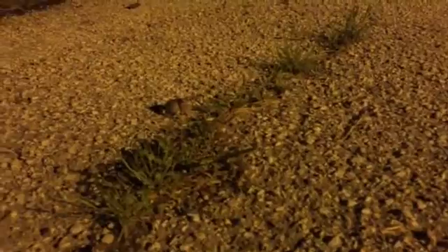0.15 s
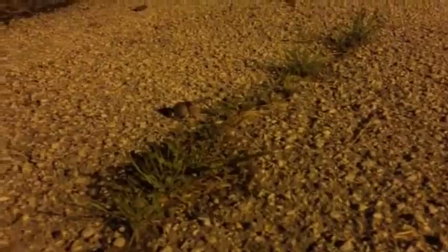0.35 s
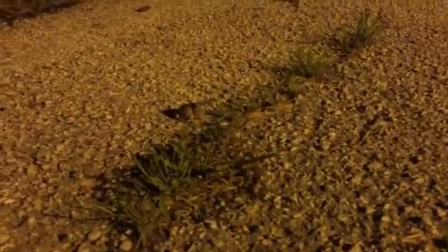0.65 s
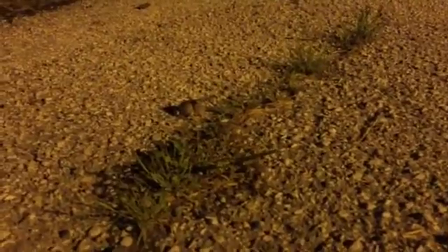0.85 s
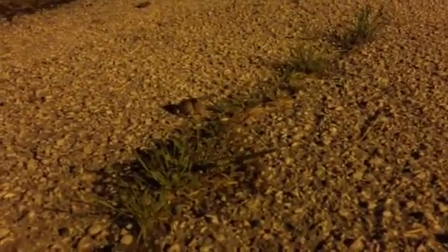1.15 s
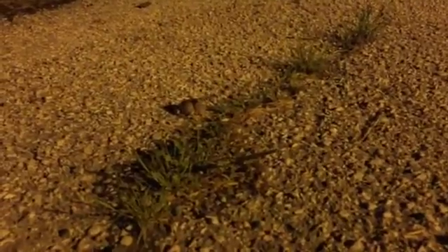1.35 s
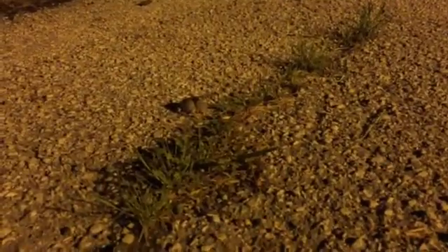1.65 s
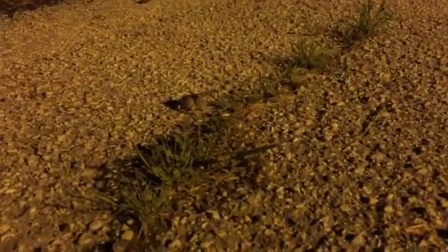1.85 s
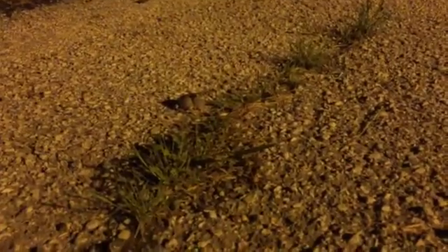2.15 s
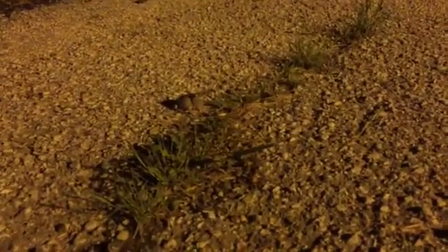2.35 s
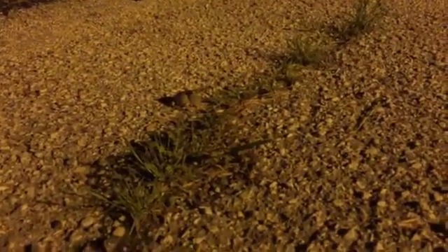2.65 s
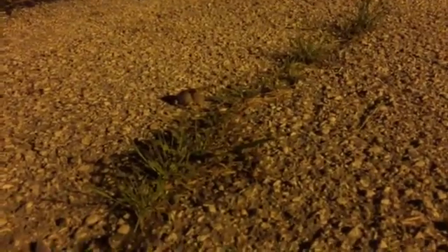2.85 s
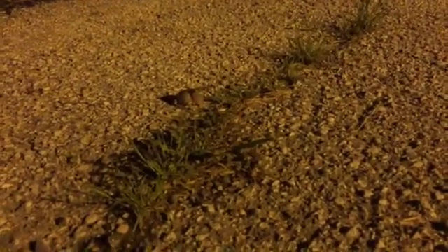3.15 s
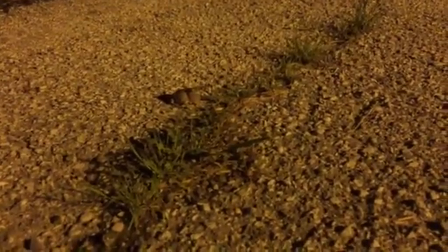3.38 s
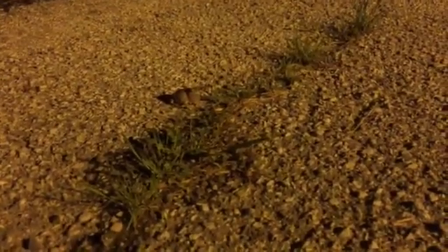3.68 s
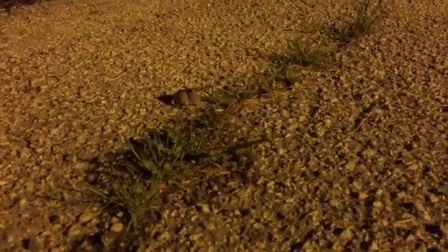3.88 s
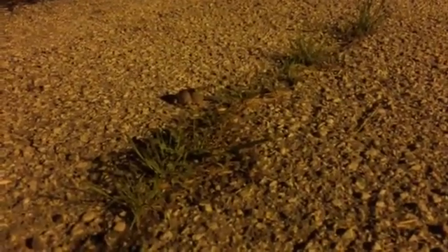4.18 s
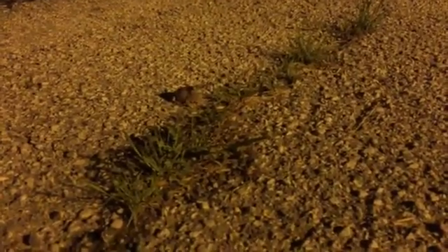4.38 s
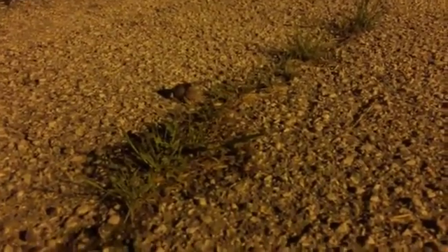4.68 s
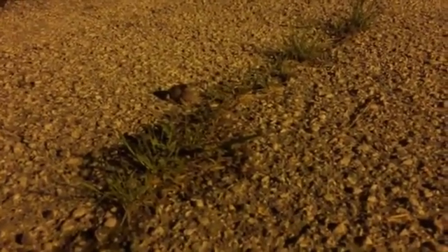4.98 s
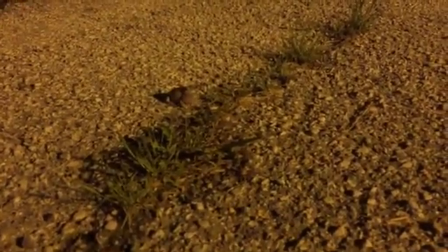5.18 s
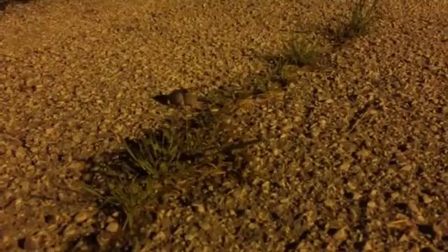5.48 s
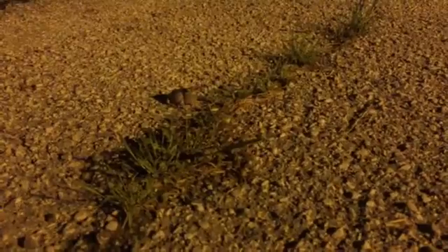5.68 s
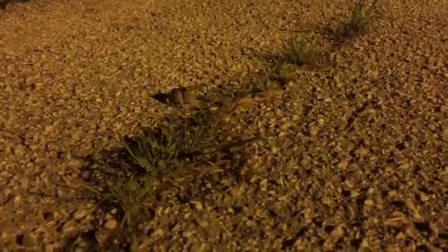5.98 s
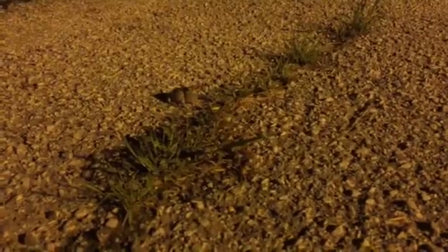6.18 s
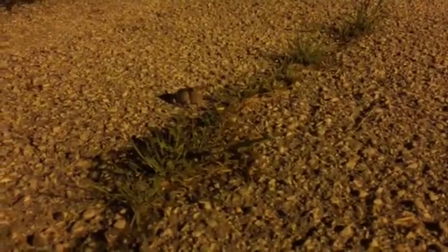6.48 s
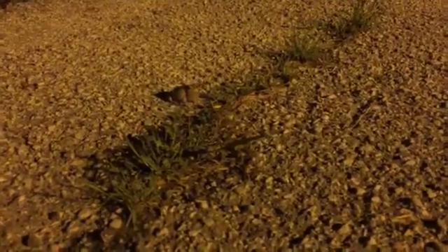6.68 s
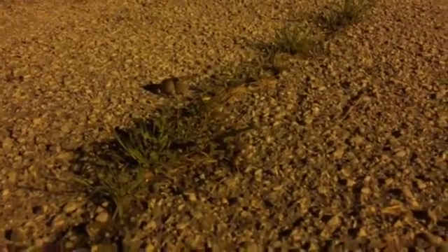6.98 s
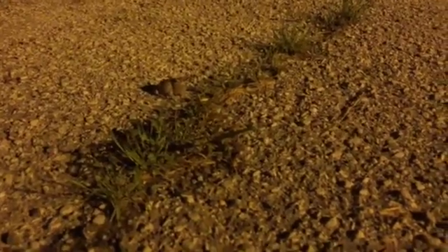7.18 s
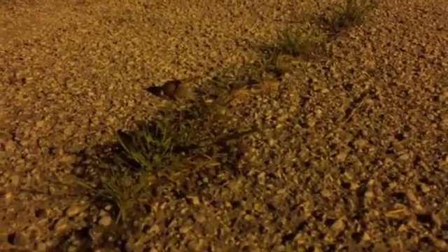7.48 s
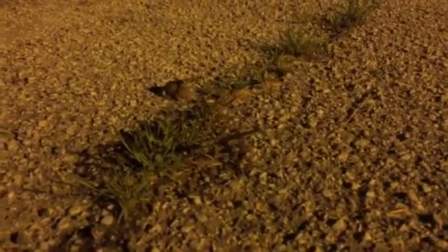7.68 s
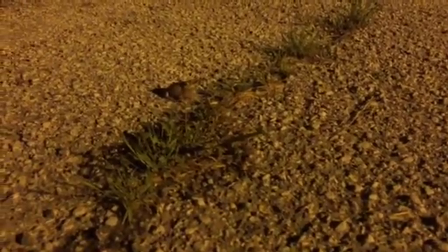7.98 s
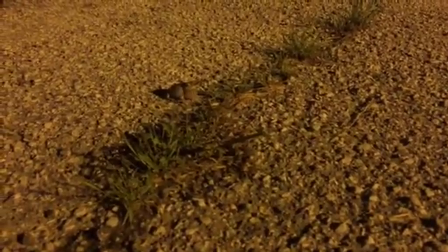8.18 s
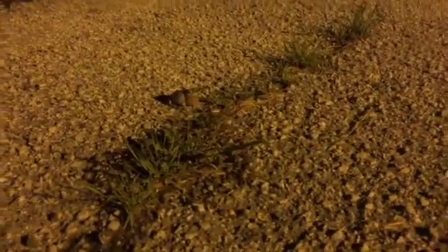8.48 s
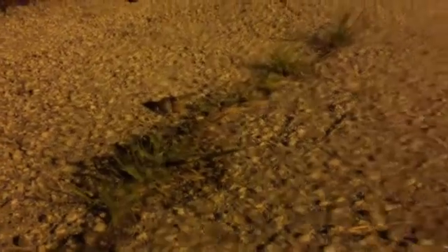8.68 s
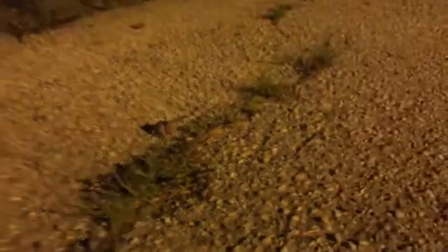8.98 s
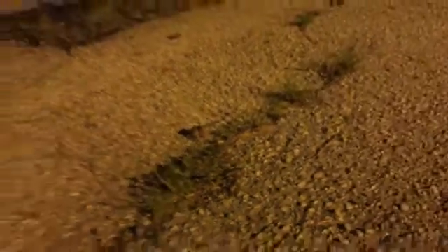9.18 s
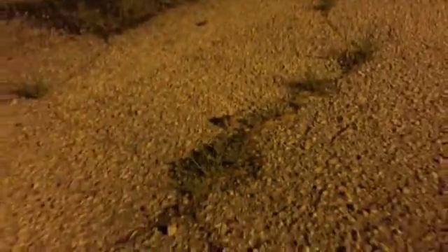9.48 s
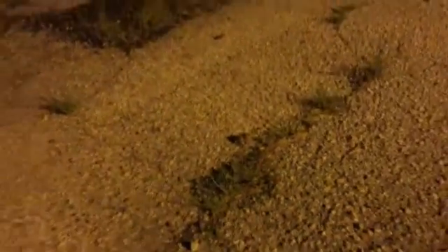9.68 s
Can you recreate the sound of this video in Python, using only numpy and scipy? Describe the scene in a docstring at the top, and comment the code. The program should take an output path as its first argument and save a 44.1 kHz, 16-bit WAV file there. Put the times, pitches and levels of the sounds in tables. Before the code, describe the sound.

Toads and small frogs call far off at night over a steady low hum, while one very near toad rattles loudly twice.

```python
"""A toad on a gravel road at night gives two loud rattling calls, each a train of short rising pulses:
air squeezed past its vocal cords rings in its swelling vocal sac. Behind it are more toads of its kind,
a faster trill, small peeping frogs, one insect chirp, faint rustles, a brief low tone, night air and the
drone of distant machinery. The close calls overload the microphone, and its gain control ducks the
background, which then swells back."""
import sys
import numpy as np
from scipy import signal
from scipy.fft import rfft, irfft, next_fast_len
from scipy.io import wavfile
from scipy.ndimage import uniform_filter1d, minimum_filter1d

SR = 44100
rng = np.random.default_rng(int(sys.argv[2]) if len(sys.argv) > 2 else 0)


def materialize(psi):
    """Save the field psi as 16-bit PCM at rate SR to the path in sys.argv[1].

    A 1-D psi becomes a single channel; in a 2-D psi each row is a channel.
    """
    bounded = np.clip(np.atleast_2d(psi).T, -1, 1)
    quanta = np.round(bounded * 32767).astype(np.int16)
    wavfile.write(sys.argv[1], SR, quanta)


N = 433944
TIME = np.arange(N) / SR


def from_db(db):
    """Decibels to gain."""
    return 10 ** (np.asarray(db) / 20)


def rms_one(x):
    """Scale to an rms of 1."""
    return x / np.sqrt(np.mean(x ** 2) + 1e-20)


def phase_of(hz):
    """Running phase of a moving pitch."""
    return 2 * np.pi * np.cumsum(hz) / SR


def envelope(start_s, end_s, attack_s, release_s):
    """Rise from the start, hold, and die away after the end."""
    rise = 1 - np.exp(-np.maximum(TIME - start_s, 0) / attack_s)
    return rise * np.exp(-np.maximum(TIME - end_s, 0) / release_s)


def shaped_noise(gain_at):
    """Noise of rms 1 whose spectrum is a function of frequency."""
    size = next_fast_len(N)
    hz = np.maximum(np.fft.rfftfreq(size, 1 / SR), 1)
    return rms_one(irfft(rfft(rng.standard_normal(size)) * gain_at(hz), size)[:N])


def coloured(spectrum):
    """Noise through an EQ curve of (Hz, dB) points."""
    points_hz, db = np.transpose(spectrum)
    return shaped_noise(lambda hz: from_db(np.interp(np.log(hz), np.log(points_hz), db)))


def narrow(centre_hz, width_hz):
    """Noise around one frequency."""
    return shaped_noise(lambda hz: 1 / (1 + ((hz - centre_hz) / width_hz) ** 2))


def drift(speed_hz):
    """A random modulator, moving mostly below this speed."""
    return narrow(0, speed_hz)


def scatter(x, t60):
    """Many small reflections off gravel and plants, dying away."""
    t = np.arange(int(t60 * SR)) / SR
    echoes = rng.standard_normal(len(t)) * from_db(-60 * t / t60) * (1 - np.exp(-t / 0.0027))
    return signal.fftconvolve(x, echoes / np.linalg.norm(echoes))[:N]


def add(out, sound, s):
    """Mix a sound in from time s."""
    start = int(round(s * SR))
    low, high = max(start, 0), min(start + len(sound), N)
    if high > low:
        out[low:high] += sound[low - start:high - start]


# EQ of the night's noise bed. Each row: frequency in Hz, relative level in dB.
AIR_EQ = [(25, -28), (45, -11), (65, 1), (115, -1.5), (170, -2.5), (270, -4.5), (390, -5), (480, -11.5),
          (800, -12), (1600, -20), (2800, -27.5), (4400, -40.5), (5700, -43), (9000, -50), (15000, -58)]


def night_air(level_db=-42):
    """Night air and far traffic make a steady, dark bed."""
    return from_db(level_db) * coloured(AIR_EQ)


# The machinery's upper tones. Each row: pitch in Hz, width of its waver in Hz, level in dB.
DRONE_TONES = [(151.5, 4.9, -50.5), (234, 3.9, -47.5), (295, 10.17, -52.5), (343.2, 3.63, -47.5),
               (357.7, 5, -64.5), (379, 4.11, -50.5), (415.3, 4, -56.5), (537, 5, -63.5), (677, 5, -62)]


def machinery(motor_hz=76.5, second_motor_hz=99.6):
    """The hum of two distant motors grows slowly fainter, under higher tones that waver on their way."""
    def tone(hz, width_hz, waver_db):
        phase = phase_of(hz + width_hz * drift(10.65) / 2)
        return rms_one(np.sin(phase) * from_db(waver_db * drift(9.2)))
    motor_db = -40.5 - 2 * np.maximum(TIME - 5.36, 0)
    surge_db = 9 * np.exp(-((TIME - 0.65) / 0.38) ** 2 / 2)
    second_db = -46 - 2 * TIME + surge_db
    hums = from_db(motor_db) * tone(motor_hz, 1.8, waver_db=0.6)
    hums += from_db(second_db) * tone(second_motor_hz, 2.86, waver_db=0.6)
    return hums + sum(from_db(db) * tone(hz, width, waver_db=0.5) for hz, width, db in DRONE_TONES)


def low_tone(start_s=5.96, end_s=6.22, level_db=-36.5, pitch_hz=182.2, sag_hz_per_s=74):
    """A soft, nearly pure far tone sinks and fades."""
    hz = pitch_hz - sag_hz_per_s * np.clip(TIME - start_s, 0, .5) + 3.97 * drift(10)
    level = from_db(level_db - 0.5 * drift(29)) * envelope(start_s, end_s, 0.013, 0.18)
    return np.sqrt(2) * level * np.sin(phase_of(hz))


def insect(start_s=6.07, end_s=6.27, level_db=-78, pitch_hz=8950):
    """One faint, thin insect chirp."""
    return from_db(level_db) * envelope(start_s, end_s, .02, .03) * narrow(pitch_hz, 200)


# Rustles and a tick. Each row: peak time in seconds, level in dB, half-width in seconds, centre in Hz.
RUSTLES = [(3.4, -63, 0.02, 7360), (3.478, -68, .008, 6500), (8.692, -50, 0.001, 9500),
           (9.75, -72.5, 0.19, 7500)]


def grit():
    """Faint bursts of high noise, as of small stones and dry grass."""
    return sum(from_db(db) * np.exp(-((TIME - s) / width_s) ** 2 / 2) * narrow(hz, 3000)
               for s, db, width_s, hz in RUSTLES)


# Fader ride of the small frogs. Each row: time in seconds, level in dB.
FROG_FADER = [(0, -59), (1.2, -59.5), (1.6, -67), (3.9, -63.5), (6.5, -60), (9.25, -58), (9.84, -52.5)]


def small_frogs(pips_per_s=6.5, half_width_s=.0025, sweep=0.085, spread=0.045, wet_db=1.5):
    """Six small far frogs repeat short, rising pips, each at its own uneven pace."""
    level_db = np.interp(TIME, *np.transpose(FROG_FADER))
    # the harder they call, the higher, up to a limit
    pitch_hz = np.minimum(3470 + 12 * (level_db - level_db.mean()), 3519)
    out = np.zeros(N)
    for place in np.linspace(-1, 1, 6):
        rate = pips_per_s * (1 + .15 * place)
        beats = np.cumsum(rate * (1 + .3 * drift(3.5))) / SR + rng.random()
        within = (beats % 1 - .5) / rate / half_width_s
        hz = pitch_hz * (1 + spread * place + sweep * np.tanh(within / 2) + 0.033 * drift(200))
        uneven = from_db(2.5 * np.tanh(drift(5)))
        out += np.exp(-within ** 2 / 2) * uneven * np.sin(phase_of(hz))
    return from_db(level_db) * rms_one(out + from_db(wet_db) * scatter(out, t60=0.22))


def peeper(level_db=-66.5, pitch_hz=3340, peeps_per_s=5.4, half_width_s=0.0078, sweep=.04, wet_db=-4.5):
    """One small frog, a little nearer, keeps up fairly regular rising peeps."""
    beats = np.cumsum(peeps_per_s * (1 + 0.128 * drift(2))) / SR
    within = (beats % 1 - .5) / peeps_per_s / half_width_s
    hz = pitch_hz * (1 + sweep * np.tanh(within / 2) + 0.024 * drift(200))
    peeps = np.exp(-within ** 2 / 2) * np.sin(phase_of(hz))
    return from_db(level_db) * rms_one(peeps + from_db(wet_db) * scatter(peeps, t60=0.16))


def trill(start_s=1.72, end_s=5.8, level_db=-49, pitch_hz=1752, pulses_per_s=53, wet_db=-5.5):
    """A far toad of another kind holds one fast trill, sliding up into its note."""
    hz = pitch_hz - 110 * np.exp(-np.maximum(TIME - start_s, 0) / .12) + 14 * drift(46)
    throb = np.maximum(np.sin(2 * np.pi * pulses_per_s * TIME), 0) ** 0.77
    voice = throb * np.sin(phase_of(hz))
    level = from_db(level_db) * envelope(start_s, end_s, attack_s=0.1, release_s=0.34)
    return level * rms_one(voice + from_db(wet_db) * scatter(voice, t60=0.46))


# A toad pulse's layers: fundamental, octave, buzz. Each row: crest level in dB, growth in dB per second,
# resonance lift in dB, resonance width as a share of the pitch, release start in seconds past the crest.
PULSE_LAYERS = [(-14, 849, 6.5, .15, 0.0058), (0.67, 135, 27, 0.084, 0.0048),
                (8.5, 379.5, 16, 0.047, 0.0079)]


def pulse_shape(t, climb_per_s=10.5, attack_db_per_s=6493, release_db_per_s=3698):
    """Pitch ratio and layer levels at t seconds from the crest, where the pitch meets the resonance."""
    climbing = np.clip(t, -0.01546, 0.007)
    end_flick = 0.019 * np.expm1(climbing / 0.0033)
    ratio = 1 + climb_per_s * climbing + end_flick
    attack_db = attack_db_per_s * np.minimum(t + 0.015, 0)
    levels_db = []
    for crest_db, growth, lift_db, width, release_s in PULSE_LAYERS:
        resonance_db = lift_db * np.expm1(-((ratio - 1) / width) ** 2 / 2)
        release_db = release_db_per_s * np.maximum(t - release_s, 0)
        levels_db.append(crest_db + attack_db + growth * np.minimum(t, 0) + resonance_db - release_db)
    return ratio, levels_db


# Buzz of the vocal cords. Each row: harmonic number, level in dB within the buzz layer.
CORD_HARMONICS = [(3, -43), (4, -44.5), (5, -46.5), (6, -39.5), (7, -60), (8, -52), (9, -55), (10, -65),
                  (11, -65), (12, -60.5), (13, -59.5)]


def toad_pulse(pitch_hz, fullness, jitter):
    """One squeeze of air sweeps the octave up through the sac's resonance. Gives sound and airflow."""
    t = (np.arange(len(jitter)) - len(jitter) / 2) / SR
    # a slack sac gives shorter, rougher pulses with more fundamental
    slack = 1 - np.clip(fullness, 0, 1)
    ratio, (low_db, octave_db, buzz_db) = pulse_shape(t / (1 - 0.2 * slack))
    low, octave = from_db(low_db + 14 * slack ** 1.33), from_db(octave_db)
    # while the sac is half full the pitch climbs from further below
    half_full = 2 * np.sqrt(slack * (1 - slack))
    ratio = ratio ** (1 + 0.447 * half_full * (t < 0))
    # the cords flutter irregularly until they lock on
    flutter = jitter * (0.019 + .2 * slack + 0.09 * np.clip(-t / .015, 0, 1) ** 2)
    phase = phase_of(pitch_hz * ratio * (1 + 0.16 * flutter))
    harmonics = sum(from_db(db) * np.sin(number * phase) for number, db in CORD_HARMONICS)
    buzz = from_db(buzz_db + 0.5 * slack) * harmonics
    ring = octave * (np.sin(2 * phase) + from_db(-29.5) * np.cos(3 * phase))
    # a puff of air slips through before the cords catch
    puff = from_db(10.5) * half_full * np.exp(-((t + 0.0098) / 0.0024) ** 2 / 2)
    fade = signal.windows.tukey(len(t), .2)
    sound = (low * np.sin(phase) + ring + buzz) * (1 + flutter)
    airflow = np.sqrt(low * octave) + puff
    return sound * fade, airflow * fade


def far_toad(triggers, pitch_hz, dull_hz=2860):
    """A toad pulse on every trigger, dulled by distance."""
    pulse, _ = toad_pulse(pitch_hz, fullness=0.632, jitter=np.zeros(SR // 20))
    call = signal.fftconvolve(triggers, pulse, "same")
    return signal.sosfilt(signal.butter(4, dull_hz, fs=SR, output="sos"), call)


# Fader ride of the far chorus. Each row: time in seconds, level in dB.
CHORUS_FADER = [(0, -41), (1.2, -42.5), (2.4, -42.5), (3.2, -42), (3.9, -44.5), (6.5, -40), (7.3, -45),
                (8.6, -40.5), (9.25, -45.5), (9.84, -37.5)]


def chorus(pitch_hz=1164, spread=0.0606, pulses_per_s=23.8, waver_db=1.8, wet_db=4.5):
    """Four far toads rattle over each other, blurred by distance into an even din."""
    out = np.zeros(N)
    for place in np.linspace(-1, 1, 4):
        rate = pulses_per_s * rng.uniform(.94, 1.06) * (1 + .05 * drift(15))
        beats = np.cumsum(rate) / SR + rng.random()
        triggers = np.diff(np.floor(beats), prepend=0) * from_db(waver_db * drift(0.66))
        out += far_toad(triggers, pitch_hz * (1 + spread * place))
    out += from_db(wet_db) * scatter(out, t60=0.82)
    running_rms = np.sqrt(uniform_filter1d(out ** 2, SR // 2) + 1e-12)
    return from_db(np.interp(TIME, *np.transpose(CHORUS_FADER))) * out / running_rms


# Mid-distance calls. Each row: start and end in seconds, level in dB, pitch in Hz, pulses per second.
NEIGHBOUR_CALLS = [(-.1, 0.357, -45.5, 1082, 24), (0.605, 1.326, -43, 1117, 22.7),
                   (1.75, 2.319, -46, 1177, 17.4), (2.564, 3.102, -47, 1178, 29),
                   (2.894, 3.496, -40.5, 1117, 23.6), (3.999, 4.498, -38.5, 1116, 21.8),
                   (5.75, 6.298, -61, 1127, 42), (6.446, 6.997, -46, 1138, 30.5),
                   (6.883, 7.403, -41, 1141, 21), (8.34, 9.132, -43.5, 1121, 19.8),
                   (9.31, 9.899, -41.5, 1157, 27.5), (9.537, 9.9, -61, 1095, 31)]


def neighbours(swell_s=0.06, uneven_db=.8, jitter_s=0.000998, wet_db=-5):
    """Toads some way off give the near toad's call: it swells, rattles and stops short."""
    out = np.zeros(N)
    for start, end, db, pitch_hz, rate in NEIGHBOUR_CALLS:
        triggers = np.zeros(N)
        for s in np.arange(end, start, -1 / rate):
            late, loud = rng.standard_normal(2)
            swell = 1 - np.exp(-(s - start) / swell_s)
            add(triggers, [from_db(uneven_db * loud) * swell], s + jitter_s * late)
        time_share = (end - start) * SR / N
        out += from_db(db) * np.sqrt(time_share) * rms_one(far_toad(triggers, pitch_hz))
    return (out + from_db(wet_db) * scatter(out, t60=0.34)) / np.hypot(1, from_db(wet_db))


# Timing of the near calls. Each row: first crest in seconds, pulse count, first and settled gap in
# seconds, pulses to settle, stretch of the last gap in seconds.
NEAR_RHYTHM = [(4.358, 22, .03713, .0409, 7.86, .0034), (7.3881, 16, .03554, .03983, 9.86, .0048)]
# Their swell. Each row: first and full gain in dB, pulses to reach full gain, pitch in Hz.
NEAR_SWELL = [(-26.5, 9.0, 8, 1171), (-19, 9, 5.5, 1177)]


def call_pulses(empty_db=-13, full_sac_db=9.4, slowing_pulses=1.19, pitch_scatter=0.008):
    """A call starts quick and soft, settles as the sac fills and slows at its end."""
    rows = []
    for rhythm, (first_db, full_db, swell, hz) in zip(NEAR_RHYTHM, NEAR_SWELL):
        start, count, first_gap, settled_gap, settle, stretch = rhythm
        k = np.arange(count)
        gaps = np.interp(k[:-1], [0, settle], [first_gap, settled_gap])
        gaps += stretch * np.exp(-k[:-1][::-1] / slowing_pulses)
        db = full_db + (first_db - full_db) * np.maximum(1 - k / swell, 0) ** 2
        fullness = np.clip((db - empty_db) / (full_sac_db - empty_db), 0, 1)
        flat = 0.14 * np.exp(-(fullness / 0.089) ** 2)   # an empty sac sounds flat
        pitch_hz = hz * (1 - flat + pitch_scatter * rng.standard_normal(count))
        rows += zip(start + np.append(0, np.cumsum(gaps)), db, pitch_hz, fullness)
    return rows


# EQ of the near toad's rasp and rattle. Each row: frequency in Hz, relative level in dB.
RASP_EQ = [(800, -34.5), (1100, -6), (1550, -7.5), (2300, 2.5), (2900, -5.5), (3500, -14), (4400, -29.5),
           (5400, -32.5), (6800, -24.5), (9000, -38), (15000, -42.5)]


def near_toad(rasp_db=-30, rattle_db=-25, grain_db=8.5, clearing_db_per_s=5.5, ground_db=-23):
    """Two close calls: swept pulses, a rasp of air, a grainy rattle and scatter off the gravel."""
    voice, airflow, rattling = np.zeros((3, N))
    jitter, half = drift(400), round(SR / 40)
    for s, db, pitch_hz, fullness in call_pulses():
        crest = int(s * SR)
        pulse, flow = toad_pulse(pitch_hz, fullness, jitter[crest - half:crest + half])
        add(voice, from_db(db) * pulse, s - half / SR)
        add(airflow, from_db(db) * flow, s - half / SR)
        # air already rattles past the cords as each squeeze begins; this clears as the call goes on
        elapsed = min(s - start for start, *_ in NEAR_RHYTHM if start <= s)
        strength = from_db(-clearing_db_per_s * elapsed) * (fullness / 1.38) ** 2
        add(rattling, strength * signal.windows.tukey(2 * half, .5), s - .032)
    rattle = from_db(rattle_db + grain_db * np.minimum(drift(130), 2)) * rattling
    voice += (from_db(rasp_db) * airflow + rattle) * coloured(RASP_EQ)
    # so small a body radiates no bass
    voice = signal.sosfilt(signal.butter(4, 790, "high", fs=SR, output="sos"), voice)
    return voice + from_db(ground_db) * scatter(voice, t60=0.03)


def scene():
    """The near toad over the night's background, in mono."""
    far_frogs = neighbours() + chorus() + trill() + small_frogs() + peeper()
    bed = night_air() + machinery() + low_tone() + insect() + grit()
    return (bed + far_frogs + near_toad())[None]


def gain_control(x, threshold_db=-1.5, release_db_per_s=26, attack_s=0.059, hold_s=0.12):
    """Peaks over the threshold turn the gain down; it holds briefly and creeps back."""
    excess_db = np.maximum(20 * np.log10(np.abs(x).max(axis=0) + 1e-9) - threshold_db, 0)
    size = 2 * int(hold_s * SR / 2) + 1
    held = -minimum_filter1d(-excess_db, size, origin=size // 2)
    released = np.maximum.accumulate(held + release_db_per_s * TIME) - release_db_per_s * TIME
    pole = np.exp(-1 / (attack_s * SR))
    return x * from_db(-signal.lfilter([1 - pole], [1, -pole], released))


def record(dry, ceiling=0.71, hardness=4.17, lopsided=0.0025, stopband_hz=16300):
    """Gain control, a rounded and slightly lopsided overload on what slips past it, and a high cut."""
    x = gain_control(dry)
    x = x / (1 + np.abs(x / ceiling) ** hardness) ** (1 / hardness)
    x = x + lopsided * signal.sosfilt(signal.butter(2, 1000, "high", fs=SR, output="sos"), x ** 2)
    return signal.sosfilt(signal.cheby2(14, 70, stopband_hz, fs=SR, output="sos"), x)


dry = scene()
out = record(dry)
materialize(out)
```